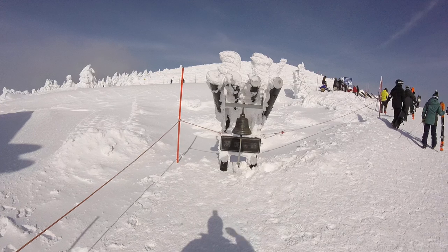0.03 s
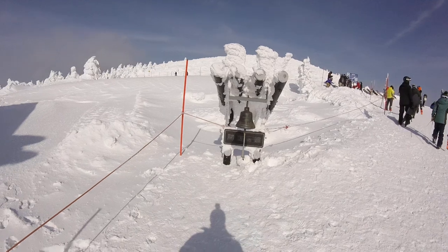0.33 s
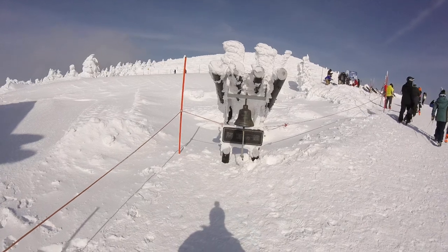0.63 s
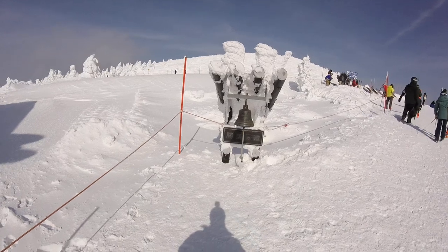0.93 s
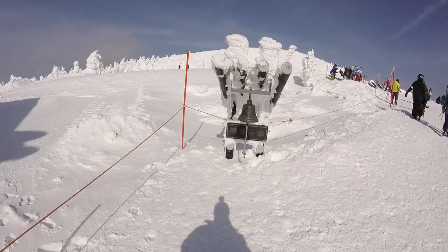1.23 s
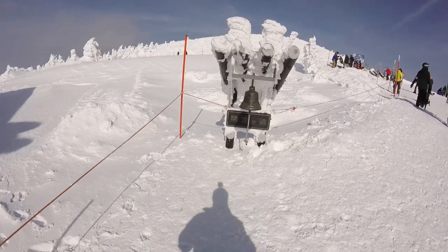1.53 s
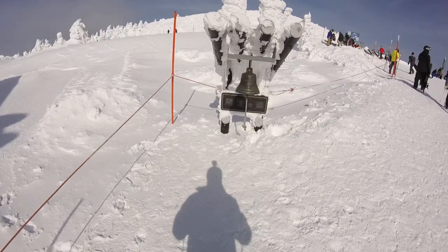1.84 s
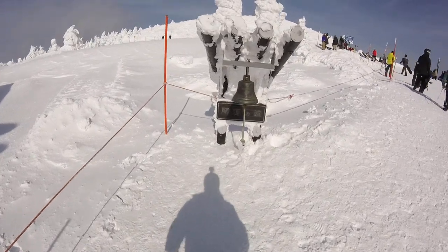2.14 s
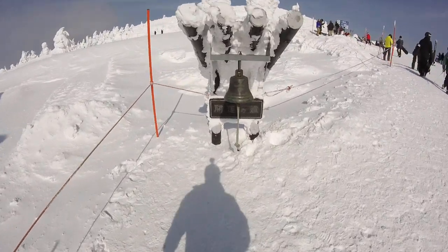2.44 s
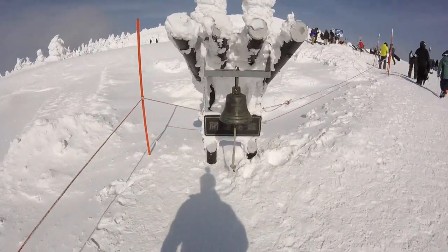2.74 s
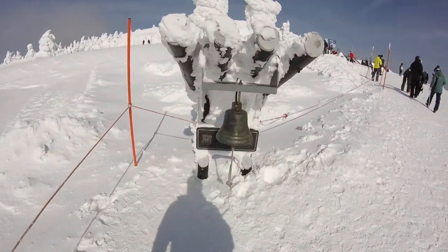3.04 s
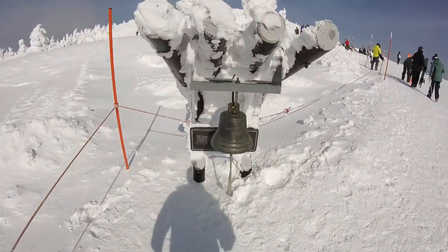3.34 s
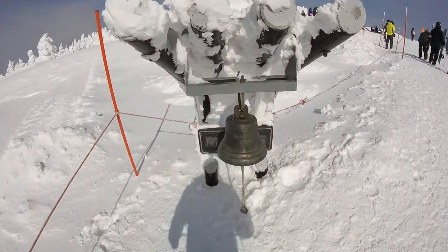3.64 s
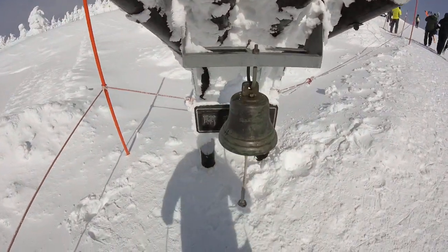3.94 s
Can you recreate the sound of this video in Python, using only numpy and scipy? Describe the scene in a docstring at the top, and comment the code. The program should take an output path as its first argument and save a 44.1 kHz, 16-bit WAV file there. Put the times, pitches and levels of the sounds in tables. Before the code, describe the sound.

Light wind fades in over the first second as an even hiss in open air. Gusts push on the microphone with a low rumble and soft thumps, swelling around 1.8, 2.5 and 3 seconds, strongest near 3.6. A tiny tick at 0.7 seconds and faint snow scuffs and squeaks, likely steps, near 1, 1.4, 3, 3.5 and 3.9 seconds are barely audible.

```python
"""An even hiss of air fades in from silence over the first second: light wind on a snowy slope.
Under the hiss, gusts push on a camera microphone, making a deep rumble that swells and thumps.
A few soft scuffs and squeaks, likely steps in snow, and one tiny icy tick can barely be heard."""
import sys
import numpy as np
from scipy import signal
from scipy.fft import rfft, irfft
from scipy.io import wavfile
from scipy.ndimage import uniform_filter1d

SR = 44100
rng = np.random.default_rng(int(sys.argv[2]) if len(sys.argv) > 2 else 0)


def wrap_up_sound(samples):
    """Save the sound to the file named by the first command line argument, as 16-bit audio."""
    columns = np.atleast_2d(samples).T
    # keep every value between -1 and 1, then stretch to whole-number steps
    tamed = np.clip(columns, -1, 1)
    steps = np.round(tamed * 32767).astype(np.int16)
    wavfile.write(sys.argv[1], SR, steps)


N = 176400  # 4 seconds


def amp(db):
    """Turns decibels into a number to multiply a sound by."""
    return 10 ** (np.asarray(db) / 20)


def evened(x):
    """Scales a signal so that its average strength (rms) is 1."""
    return x / np.sqrt(np.mean(x ** 2) + 1e-20)


def level_at(spectrum, hz):
    """Reads a level between the rows of a (frequency, level) table, on a log-frequency scale."""
    row_hz, row_db = np.transpose(spectrum)
    return np.interp(np.log(hz + 1), np.log(row_hz + 1), row_db)


def noise(spectrum):
    """Noise of strength 1 with the given balance of low and high frequencies."""
    gains = amp(level_at(spectrum, np.fft.rfftfreq(N, 1 / SR)))
    return evened(irfft(rfft(rng.standard_normal(N)) * gains, N))


def wobble(samples):
    """A random wobble of strength 1; averaging over more samples makes it slower."""
    return evened(uniform_filter1d(rng.standard_normal(N), size=samples))


def air_hiss(level_db=-58.5, patch_db=0.61):
    """Moving air hisses evenly, with faint drifting patches that are louder or softer."""
    # tone of the hiss: (frequency [Hz], relative level [dB])
    hiss_spectrum = [(20, -1), (70, -0.5), (140, -3), (172, -6), (205, -0.5), (235, -6.5), (320, -6),
                     (500, -9.5), (900, -12), (1400, -14.5), (2500, -17), (2950, -16.5), (3400, -20.5),
                     (5000, -23.5), (7600, -29), (8500, -28.5), (9200, -32), (10500, -33), (12000, -37),
                     (15000, -41.5)]
    frames = N // 256 + 5  # short slices of time
    hz = np.fft.rfftfreq(1024, 1 / SR)
    real, imaginary, patches = rng.standard_normal((3, frames, len(hz)))
    patches = uniform_filter1d(patches, size=14, axis=0)  # smooth over time
    patches = evened(uniform_filter1d(patches, size=12, axis=1))  # and over frequency
    slices = (real + 1j * imaginary) * amp(level_at(hiss_spectrum, hz) + patch_db * patches)
    hiss = signal.istft(slices.T, nperseg=1024, noverlap=768)[1][:N]
    return amp(level_db) * evened(hiss)


def low_rush(t, start_db=-70.5, rise_db_per_s=2):
    """Air swirls around the camera body in a low rush that grows as the wind picks up."""
    # tone of the rush: (frequency [Hz], relative level [dB])
    rush_spectrum = [(20, -21), (60, 0.5), (100, -2), (140, -2.5), (200, -4.5), (320, -16.5), (1000, -40),
                     (10000, -80)]
    return noise(rush_spectrum) * amp(start_db + rise_db_per_s * t)


def icy_tick(t, start_s=0.7067, rise_s=0.0008, pitch_hz=12400, wobble_hz=600, level_db=-65):
    """One tiny tick: a very high, wavering tone a few milliseconds long."""
    age = np.maximum(t - start_s, 0) / rise_s
    loudness = amp(level_db) * age * np.exp(1 - age)
    hz = pitch_hz + wobble_hz * wobble(16)
    return loudness * np.sin(2 * np.pi * np.cumsum(hz) / SR)


def snow_squeaks(t, half_width_hz=90):
    """Packed snow slips and rings briefly, each time in a narrow band around one pitch."""
    # faint squeaks: (middle [s], half length [s], pitch [Hz], level [dB])
    squeaks = [(0.989, 0.0092, 1750, -66), (0.991, 0.0091, 3820, -74), (1.38, 0.027, 2960, -72),
               (1.417, 0.035, 1730, -68), (2.96, 0.03, 1700, -72), (3.065, 0.024, 2850, -69),
               (3.507, 0.024, 2940, -75), (3.855, 0.0097, 1700, -68)]
    hz = np.fft.rfftfreq(N, 1 / SR)
    out = np.zeros(N)
    for middle, half, pitch, db in squeaks:
        band = 1 / (1 + ((hz - pitch) / half_width_hz) ** 2)
        ring = evened(irfft(rfft(rng.standard_normal(N)) * band, N))
        out += amp(db) * np.exp(-0.5 * ((t - middle) / half) ** 2) * ring
    return out


def snow_scuffs(t, grain_db=3):
    """Rubbing snow makes short swells of noise, grainy as the crystals give way."""
    # soft scuffs: (middle [s], half length [s], level [dB])
    scuffs = [(0.993, 0.0069, -69), (1.4, 0.04, -77), (2.947, 0.048, -70.5), (3.072, 0.04, -69),
              (3.53, 0.04, -71), (3.848, 0.008, -64.5)]
    # tone of the rubbing: (frequency [Hz], relative level [dB])
    rub_spectrum = [(300, -9), (1100, -21), (1750, -4), (2300, 1), (2950, -1), (3400, -2), (4000, -9),
                    (5500, -17), (12000, -36)]
    grain = evened(amp(grain_db * wobble(220)))
    swells = sum(amp(db) * np.exp(-0.5 * ((t - middle) / half) ** 2) for middle, half, db in scuffs)
    return noise(rub_spectrum) * grain * swells


def wind_rumble(t, boost_db=1.5):
    """Slow swirls of air push on the microphone, as strongly as each gust blows."""
    # wind pressure on the microphone: (time [s], relative level [dB])
    gusts = [(0.1, -57), (0.28, -51.5), (0.6, -55), (1.0, -64.5), (1.19, -54.5), (1.4, -60), (1.61, -60),
             (1.68, -48.5), (1.76, -42.5), (1.825, -55), (1.89, -46.5), (1.97, -52.5), (2.13, -57.5),
             (2.35, -60.5), (2.43, -50), (2.5, -45), (2.57, -59), (2.68, -51), (2.76, -59), (2.9, -57),
             (3.0, -42), (3.06, -53), (3.2, -49), (3.47, -51), (3.58, -41), (3.67, -42.5), (3.76, -53),
             (3.84, -62.5), (4.0, -44)]
    # tone of the rumble: (frequency [Hz], relative level [dB])
    rumble_spectrum = [(3, -14), (11, 3), (21, -2.5), (30, -20.5), (42, -21), (65, -27), (110, -38),
                       (300, -50), (1000, -82), (10000, -130)]
    swirls = noise(rumble_spectrum)
    power = uniform_filter1d(abs(signal.hilbert(swirls)) ** 2, size=4000)
    steady = evened(swirls / np.sqrt(power))  # flatten chance swells so the gusts set the loudness
    gust_db = np.interp(t, *np.transpose(gusts))
    return steady * amp(gust_db + boost_db)


def wind_thumps(t):
    """A single swirl sweeps past the microphone: one quick pull and push of pressure."""
    # passing swirls: (middle [s], peak level [dB], half length [s])
    thumps = [(1.286, -48.5, 0.0085), (1.657, -44, 0.0083), (1.973, -40.5, 0.013), (2.444, -43, 0.017),
              (2.638, -37.5, 0.012), (3.026, -40, 0.011), (3.096, -35.5, .014), (3.558, -30, .0105)]
    out = np.zeros(N)
    for middle, db, half in thumps:
        offset = (t - middle) / half
        swing = offset / (1 + (offset / 2) ** 2) ** 3
        out += amp(db) * swing / swing.max()
    return out


def scene():
    """Adds up all the sounds at one microphone, in open air with no echo."""
    t = np.arange(N) / SR
    wind = air_hiss() + low_rush(t) + wind_rumble(t) + wind_thumps(t)
    snow = snow_scuffs(t) + snow_squeaks(t) + icy_tick(t)
    return (wind + snow)[None]


def record(dry, start_s=0.07, full_s=0.96, start_db=-16.5, cutoff_hz=15050):
    """The recorder switches on, turns itself up to full volume and cuts the highest treble."""
    t = np.arange(N) / SR
    switch_on = np.clip((t - start_s) / 0.006, 0, 1)
    fade_in = np.clip((t - start_s) / (full_s - start_s), 0, 1)
    gain = switch_on * amp(start_db * (1 - fade_in))
    lowpass = signal.firwin(511, cutoff_hz, window=("kaiser", 9), fs=SR)
    return signal.oaconvolve(dry * gain, lowpass[None], "same")


dry = scene()
out = record(dry)
wrap_up_sound(out)
```